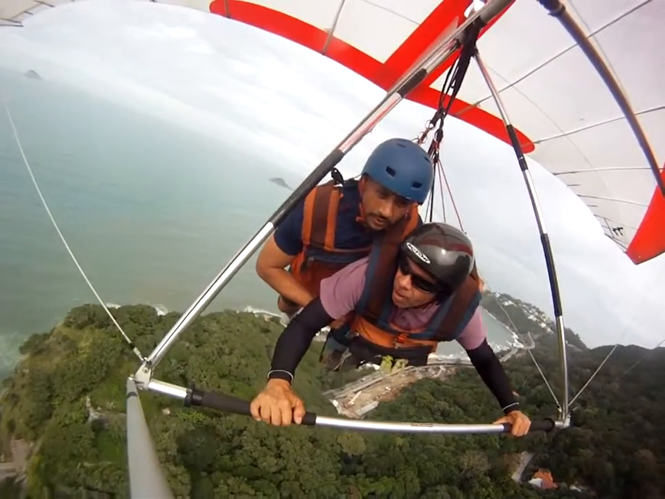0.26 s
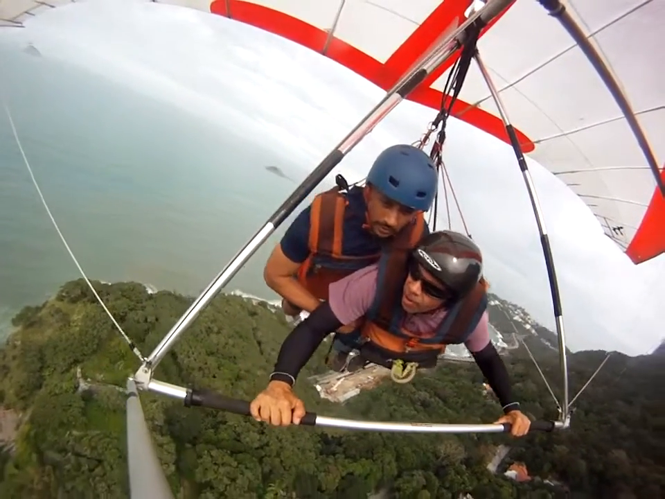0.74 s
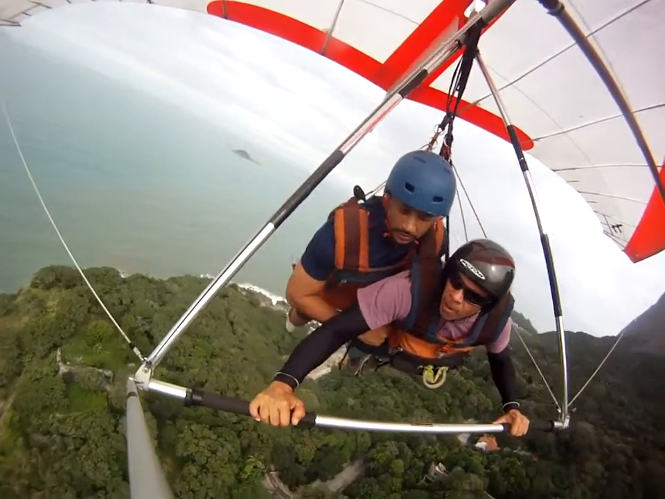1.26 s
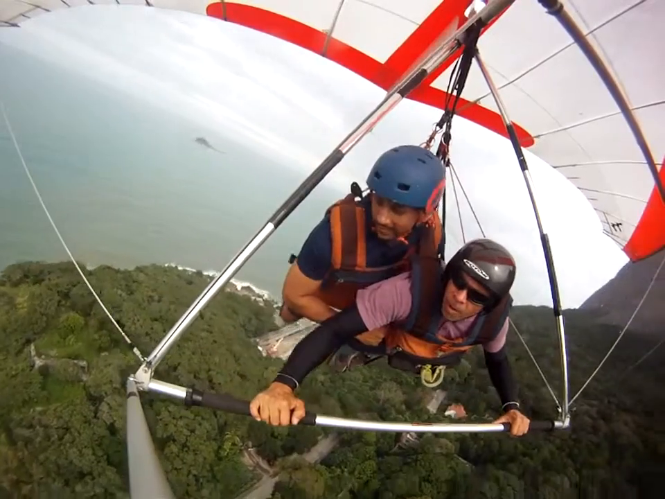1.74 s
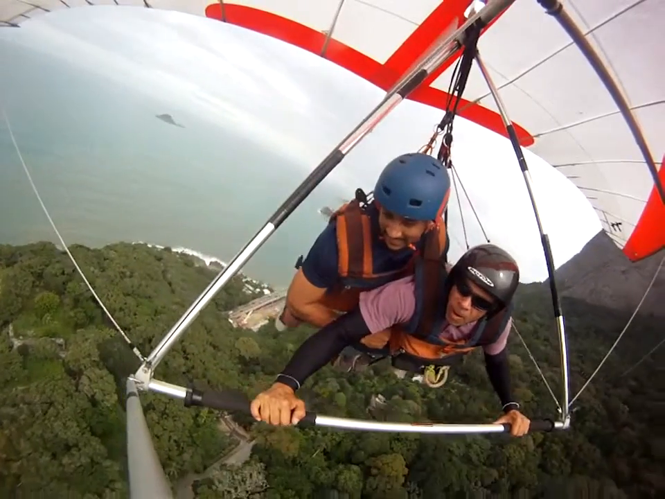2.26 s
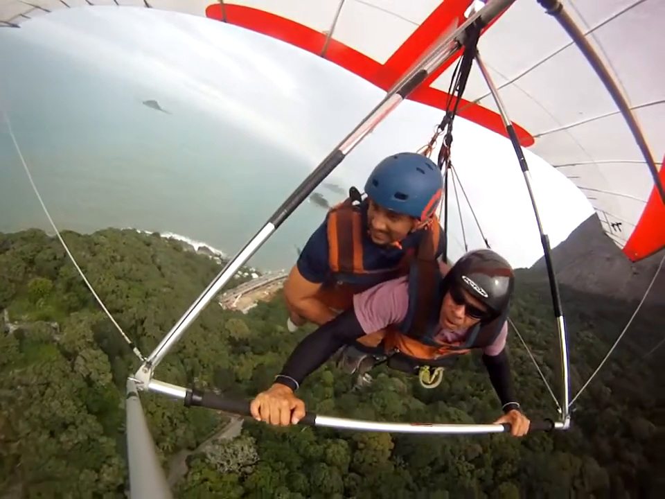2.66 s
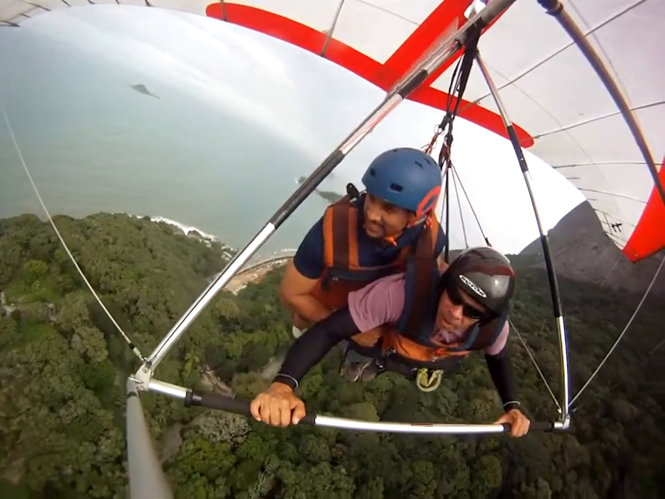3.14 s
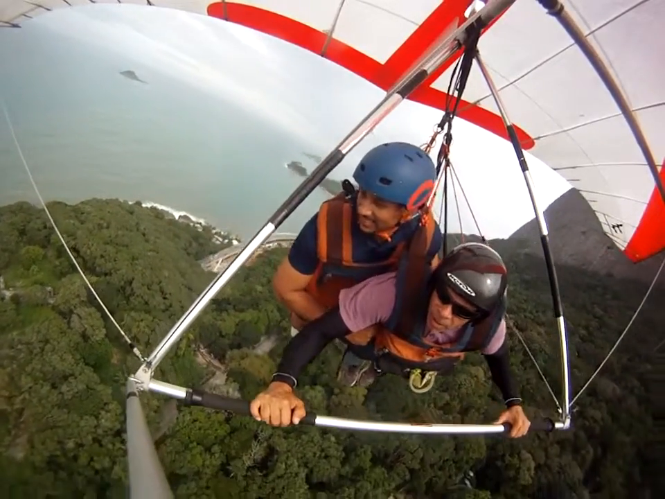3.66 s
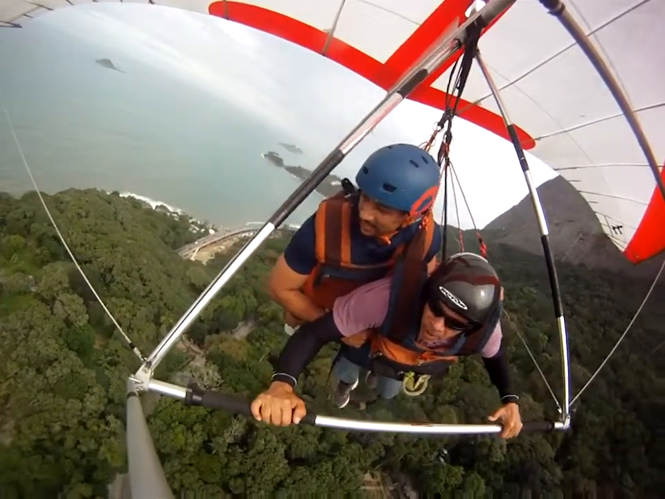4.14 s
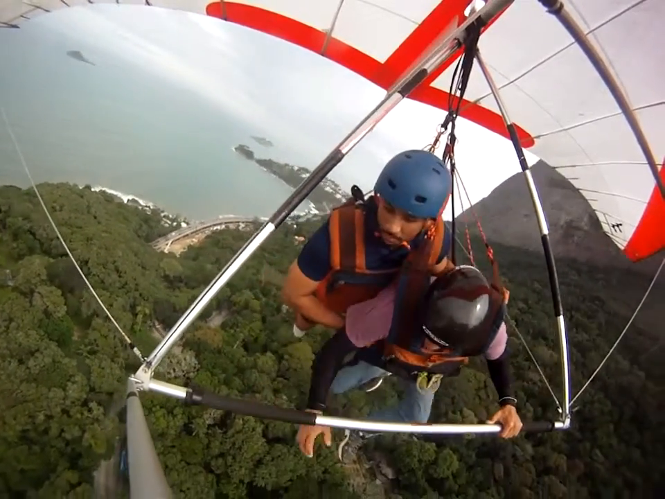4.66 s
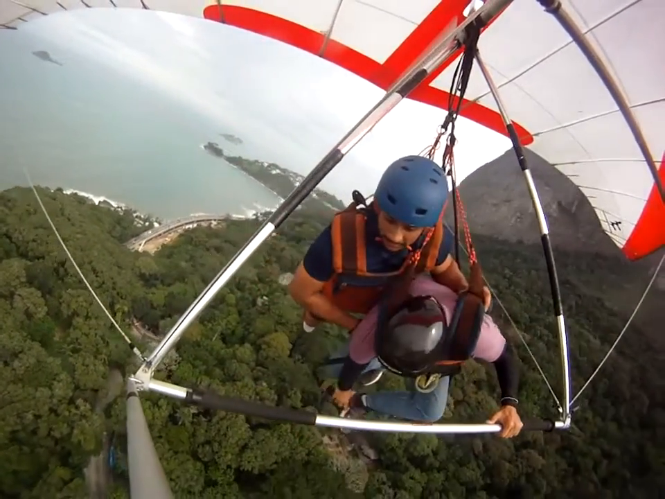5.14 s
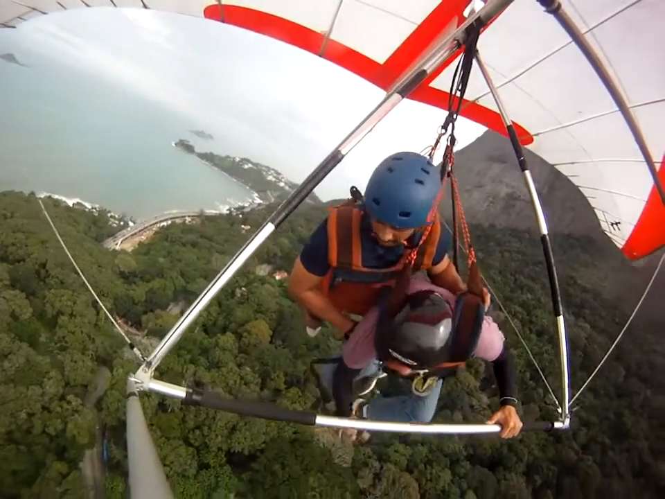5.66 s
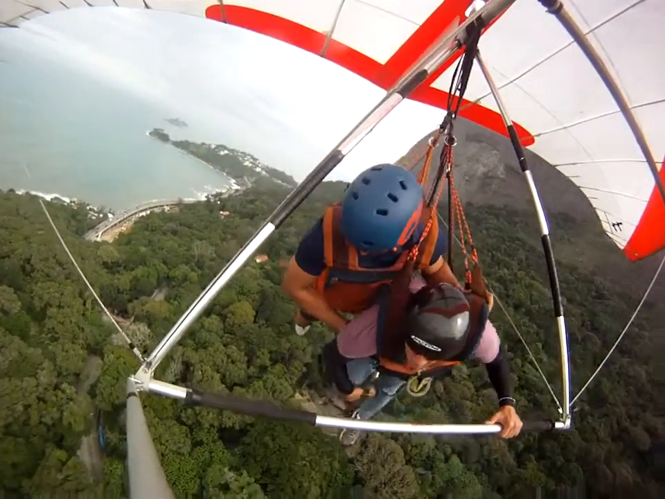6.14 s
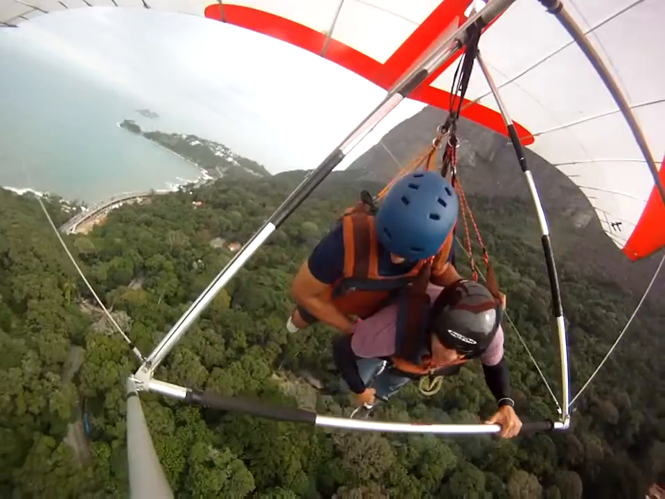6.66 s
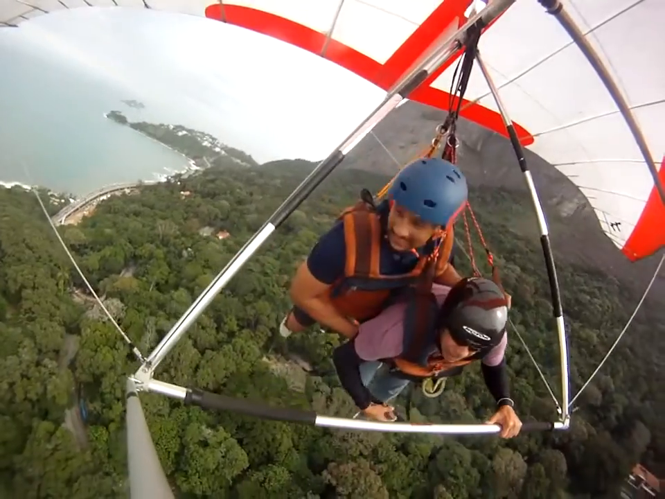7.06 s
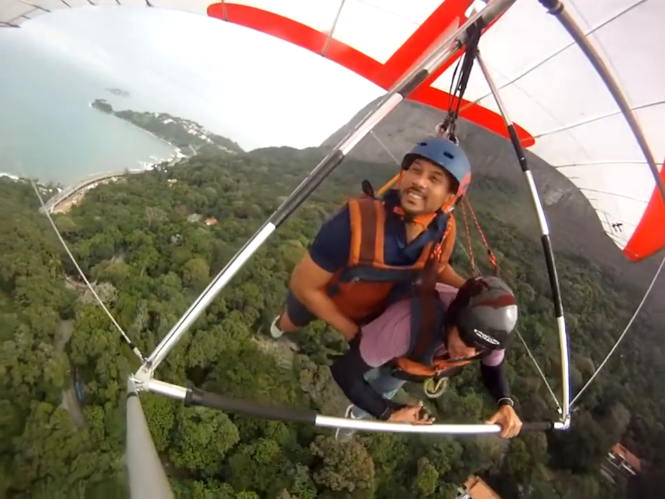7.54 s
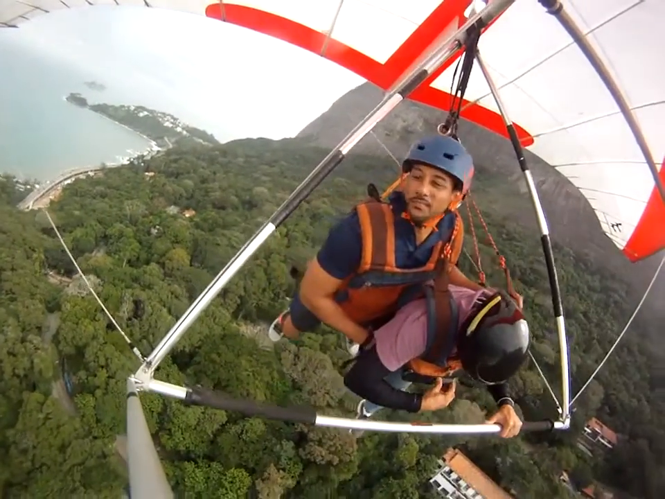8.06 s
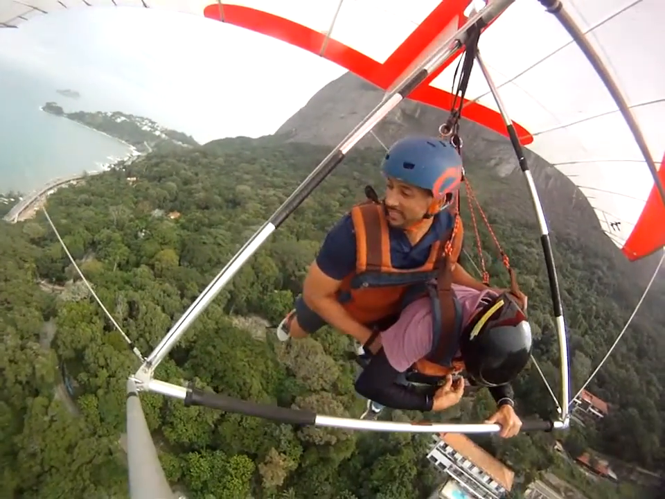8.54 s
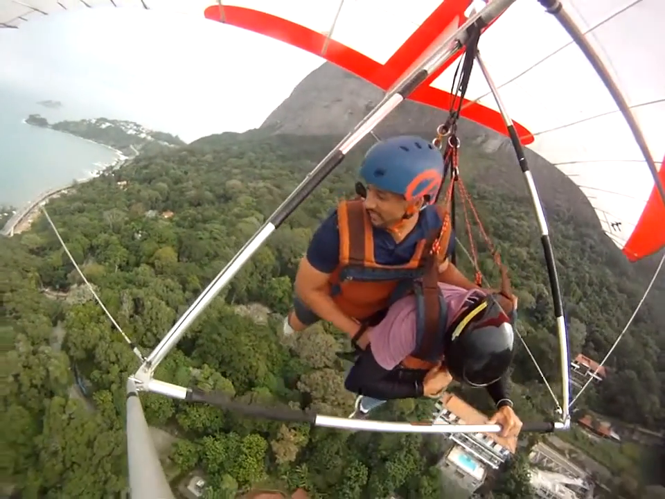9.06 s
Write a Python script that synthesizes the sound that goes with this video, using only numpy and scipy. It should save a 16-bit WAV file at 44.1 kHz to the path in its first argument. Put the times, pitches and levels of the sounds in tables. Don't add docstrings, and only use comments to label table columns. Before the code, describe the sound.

Constant rumbling airflow with a low, unsteady wire hum, a few hard wind slaps, small metallic ticks and a very faint thin whistle.

```python
import sys
import numpy as np
from scipy import signal
from scipy.io import wavfile
from scipy.ndimage import uniform_filter1d

SR = 44100
rng = np.random.default_rng(int(sys.argv[2]) if len(sys.argv) > 2 else 0)


def gain_from_db(level_db):
    decades = np.asarray(level_db, float) / 20
    return 10 ** decades


def log_audio(samples):
    frames = np.atleast_2d(samples).T
    limited = np.clip(frames, -1, 1)
    pcm = np.round(limited * 32767).astype(np.int16)
    wavfile.write(sys.argv[1], SR, pcm)


N = 410130
TIME = np.arange(N) / SR


def evened(x):
    return x / np.sqrt(np.mean(x ** 2) + 1e-20)


def curve(rows):
    s, value = np.transpose(rows)
    return np.interp(TIME, s, value)


def bumps(rows):
    return sum(db * np.exp(-((TIME - s) / half) ** 2) for s, half, db in rows)


def spell(start, length, edge):
    t = TIME - start
    return np.clip(np.minimum(t, length - t) / edge + .5, 0, 1)


def wander(low_hz, top_hz):
    count = N // 10 + 2
    hz = abs(np.fft.fftfreq(count, 10 / SR))
    chance = rng.standard_normal((count, 2)) @ [1, 1j]
    slow = np.fft.ifft(chance / (1 + (hz / top_hz) ** 2) * hz / (hz + low_hz))
    return np.interp(np.arange(N) / 10, np.arange(count), slow / slow.real.std())


def turbulence(points, size, patchy_db, patch_bins, patch_frames):
    count, hz = 4 * N // size + 8, np.fft.rfftfreq(size, 1 / SR)
    a, b, patches = rng.standard_normal((count, len(hz), 3)).T
    patches = uniform_filter1d(patches, patch_bins, 0)
    patches = evened(uniform_filter1d(patches, patch_frames, 1))
    f, db = np.transpose(points)
    colour_db = np.interp(np.log(hz + 1), np.log(f + 1), db, left=-70, right=-90)[:, None]
    z = (a + 1j * b) * gain_from_db(colour_db + patchy_db * patches)
    return evened(signal.istft(z, nperseg=size, noverlap=3 * size // 4)[1][:N])


def shedding(hz, drift, drift_hz, lumpy_db, fuzz, fuzz_hz):
    turns = np.cumsum(hz * (1 + drift * wander(2.1, drift_hz).real)) / SR
    locked = gain_from_db(lumpy_db * wander(8.4, 42).real)
    loose = wander(0.11, fuzz_hz) / np.sqrt(2)
    strength = np.sqrt(1 - fuzz) * locked + np.sqrt(fuzz) * loose
    return evened((strength * np.exp(2j * np.pi * turns)).real)


def gusts():
    # t/s, level/dB
    gust = [(0.0, -36.5), (0.44, -38), (0.65, -38.5), (1.01, -32.5), (1.27, -33), (1.6, -39), (1.86, -37.5),
            (2.48, -29.5), (2.98, -32.5), (3.18, -36.5), (4.74, -37), (5.05, -33.5), (5.65, -33.5),
            (6.16, -31.5), (6.29, -32), (7.22, -31), (7.9, -33.5), (9.3, -30)]
    # t/s, half length/s, level/dB
    slaps = [(.95, 0.09, -1.5), (1.3, .07, 0.5), (3.08, 0.099, 3), (3.48, .07, 4.5), (3.85, .08, 1.5),
             (4.2, 0.058, 1.5), (4.55, 0.12, 1.5), (4.9, .1, 3), (5.92, .07, 0.5), (6.38, .12, 2),
             (7.35, 0.063, 1), (8.45, 0.054, 0.5), (8.85, .1, 0.5)]
    mean_db = -34
    return curve(gust) - mean_db + bumps(slaps)


def ragged_flow():
    # start t/s, length/s, depth 0-1
    ragged = [
        (-.2, .43, 1),
        (0.877, 0.53, .8),
        (1.758, 0.41, 0.32),
        (3.729, 1.03, .95),
        (8.719, .48, 0.66),
    ]
    edge_s = 0.087
    return np.clip(sum(depth * spell(s, length, edge_s) for s, length, depth in ragged), 0, 1)


def wind():
    # f/Hz, level/dB per Hz
    rumble_colour = [(8, -36.5), (15, -11.5), (30, -8), (60, -2), (110, -3), (160, -10), (260, -26)]
    buffet_colour = [(60, -25.5), (110, -7.5), (155, 2.5), (250, -1), (330, -1), (450, -9), (650, -17.5),
                     (1000, -41.5)]
    rush_colour = [(200, -6.5), (450, 6.5), (600, 3), (830, -4.5), (1200, -10), (1680, -15.5), (2400, -18),
                   (2910, -21), (3420, -27), (4500, -43)]
    hiss_colour = [(1000, -13.5), (2000, -5), (2900, 0), (3420, -10), (3840, -4.5), (4300, -11),
                   (5020, -12.5), (5500, -20), (5950, -24), (7000, -56)]
    # t/s, half length/s, level/dB
    lulls = [
        (3.27, 0.091, -9.5),
        (5.28, 0.077, -5.5),
        (6.2, .06, -5),
        (7.55, 0.079, -5.5),
    ]
    gust_db, loose = gusts(), ragged_flow()
    flutter_db = 0.77 * wander(4, 46).real

    rumble_db = -24 + .3 * gust_db + bumps(lulls) + 1.4 * wander(.6, 6.5).real
    buffet_db = -20 + 3 * loose + 0.57 * wander(0.67, 5.5).real
    rush_db = -26 + gust_db + flutter_db
    hiss_db = -45.5 + .65 * gust_db + .45 * flutter_db + 1.5 * loose

    rumble = turbulence(rumble_colour, size=4096, patchy_db=1.24, patch_bins=6, patch_frames=3)
    buffet = turbulence(buffet_colour, size=2048, patchy_db=-0.06, patch_bins=5, patch_frames=4)
    rush = turbulence(rush_colour, size=512, patchy_db=0.42, patch_bins=8, patch_frames=12)
    hiss = turbulence(hiss_colour, size=512, patchy_db=0.86, patch_bins=8, patch_frames=12)
    low = gain_from_db(rumble_db) * rumble + gain_from_db(buffet_db) * buffet
    return low + gain_from_db(rush_db) * rush + gain_from_db(hiss_db) * hiss


def wires():
    # t/s, f/Hz
    speed = [(0, 344.3), (.62, 353.2), (1.1, 316), (1.42, 345), (1.95, 332.1), (2.25, 349), (2.45, 389.8),
             (3.1, 373.6), (3.75, 335.3), (4.7, 294.6), (5.08, 355.6), (5.55, 372.6), (6.0, 345.4),
             (6.9, 382.7), (7.45, 357.4), (8.08, 345.1), (8.6, 389.2), (9.3, 398)]
    # t/s, half length/s, level/dB
    moans = [(2.5, .2, 3), (3.0, .2, 2), (3.48, .08, 2.5), (4.95, .15, 3), (5.5, .3, -3.5), (5.98, 0.11, 3),
             (6.45, .22, 4), (7.15, .14, 4), (7.75, 0.18, 2), (8.45, .2, -3.5), (9.0, .2, 0)]
    loose = ragged_flow()
    hum_hz = curve(speed) * (1 + .016 * wander(3.6, 9.8).real)

    tight = shedding(hum_hz, drift=.024, drift_hz=30, lumpy_db=1.9, fuzz=.28, fuzz_hz=25)
    ragged = shedding(hum_hz, drift=0.0494, drift_hz=25.3, lumpy_db=5.0, fuzz=0.99, fuzz_hz=70)
    hum_db = -17.5 - 7 * loose + 2.07 * wander(2.7, 10).real
    hum = np.sqrt(1 - loose) * tight + np.sqrt(loose) * ragged

    moan_hz = 1.44 * uniform_filter1d(hum_hz, size=6000)
    moan_db = -27 + .65 * gusts() - 1.5 * loose + bumps(moans) + 1.7 * wander(3, 9).real
    moan = shedding(moan_hz, drift=0.024, drift_hz=26.0, lumpy_db=3.0, fuzz=0.78, fuzz_hz=35.3)
    return gain_from_db(hum_db) * hum + gain_from_db(moan_db) * moan


def jolts():
    # t/s, peak level/dB
    slams = [
        (2.635, -1),
        (3.23, -3.5),
        (9.09, -10),
        (9.164, -13),
    ]
    out, u = np.zeros(N + SR), np.linspace(-3, 3, 300)
    pulse = (1 - 2 * u ** 2) * np.exp(-u ** 2)
    for s, peak_db in slams:
        start = round(s * SR) - 60
        out[start:start + len(u)] -= gain_from_db(peak_db) * pulse
    return out[:N]


def ticks():
    # t/s, peak level/dB, tube ring level/dB, brightness level/dB
    slips = [(0.0378, -21, -21, -28), (0.3925, -16, -19, -16), (0.7891, -30, -24, -24),
             (1.8682, -21, -14, -11), (2.1106, -22, -24, -26), (2.3261, -28, -24, -24),
             (2.3895, -18.5, -26, -20), (4.2263, -20, -16, -12), (4.8653, -31, -24, -24),
             (4.9307, -13, -28, -22), (4.9696, -25, -26, -26), (5.0883, -20.5, -27, -26),
             (5.1687, -23, -27, -28), (6.6672, -28, -24, -24), (6.782, -27, -24, -24),
             (7.0259, -25, -24, -24)]
    # f/Hz, level/dB, time to fade by 60 dB/s
    modes = [(920, -6, .035), (1150, -2, .026), (1320, -5, .022), (1520, 0, .042), (1950, -8, .024),
             (2280, -7, .024), (2900, -17, .02), (4400, -18, .018)]
    # lowest f/Hz, highest f/Hz, time to fade by 60 dB/s
    crack_noise = (850, 2500, .022)
    crack_low, crack_top, crack_t60 = crack_noise
    out, t = np.zeros(N + SR), np.arange(SR // 4) / SR

    def ring(hz, db, t60):
        return gain_from_db(db - 60 * t / t60) * np.sin(2 * np.pi * hz * t)

    swell = 1 - np.exp(-t / 0.0081)
    rise = np.sin(np.minimum(t / .002, 1) * np.pi / 2) ** 2
    band = signal.butter(3, (crack_low, crack_top), "bandpass", fs=SR)
    for s, peak_db, ring_db, bright_db in slips:
        knock = np.zeros(len(t))
        for k, (hz, db, t60) in enumerate(modes):
            db = db + 1.6 * rng.standard_normal()
            if hz > 1800:
                db += .5 * (bright_db + 19)
            knock += (-1) ** k * ring(hz, db, t60)
        knock *= rise
        crack = evened(signal.lfilter(*band, rng.standard_normal(len(t))))
        crack *= gain_from_db(-12 - 60 * t / crack_t60)
        tube = swell * ring(2068, ring_db, t60=0.14)
        clamp = ring(3720, bright_db, t60=0.024)
        tick = knock / abs(knock).max() + rise * (crack + tube + clamp)
        start = round(s * SR)
        out[start:start + len(t)] += gain_from_db(peak_db + 3) * tick
    return signal.sosfilt(signal.butter(6, 5000, fs=SR, output="sos"), out[:N])


def whistle():
    # start t/s, length/s, level/dB
    spells = [
        (2.07, 1.17, -52),
        (3.497, 0.18, -62),
        (5.05, .6, -59),
        (6.953, .9, -55),
        (8.197, .5, -59),
        (8.7, .8, -50.5),
    ]
    idle_db, edge_s = -63, .1
    level = gain_from_db(idle_db) + sum(gain_from_db(db) * spell(s, length, edge_s) for s, length, db in spells)
    return level * shedding(2508, drift=.001, drift_hz=6, lumpy_db=2.5, fuzz=.4, fuzz_hz=6)


def puff():
    # t/s, half length/s, f/Hz, level/dB
    wisp = (6.315, .035, 5850, -59.5)
    s, half, hz, db = wisp
    swell = gain_from_db(db) * np.exp(-((TIME - s) / half) ** 2)
    return swell * (wander(5, 250) * np.exp(2j * np.pi * hz * TIME)).real


def scene():
    return (wind() + wires() + jolts() + ticks() + whistle() + puff())[None]


def top_cut(x):
    return signal.sosfilt(signal.butter(12, 15220, fs=SR, output="sos"), x)


def record(dry):
    x = np.pad(dry[0], (0, 2048), "reflect")
    peak_db = 20 * np.log10(abs(x) + 1e-6)
    fall = np.arange(len(x)) * 65.0 / SR
    held_peak_db = np.maximum.accumulate(peak_db + fall) - fall
    over_db = np.maximum(held_peak_db + 8.5, 0)
    lag = np.exp(-1 / (0.0012 * SR))
    ducking_db = 0.78 * signal.lfilter([1 - lag], [1, -lag], over_db)
    ducked = x * gain_from_db(1.52 - ducking_db)

    store_hz, repeat = 12000, 4
    stored = signal.resample_poly(ducked, store_hz, SR, window=("kaiser", 9))
    held = signal.resample_poly(np.repeat(stored, repeat), SR, store_hz * repeat)
    return top_cut(held[None, :N])


dry = scene()
out = record(dry)
log_audio(out)
```